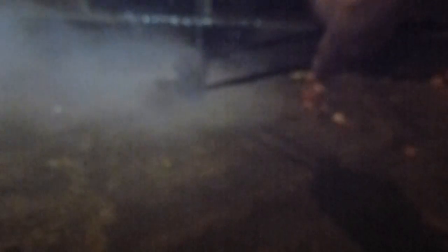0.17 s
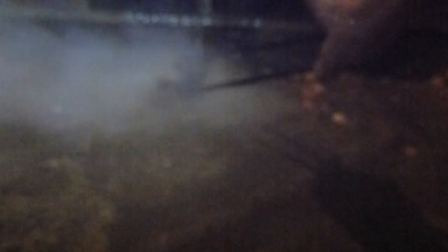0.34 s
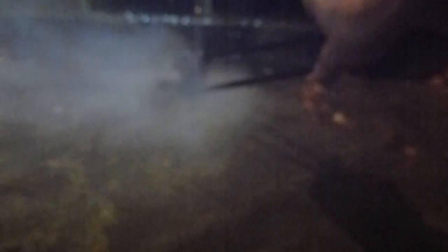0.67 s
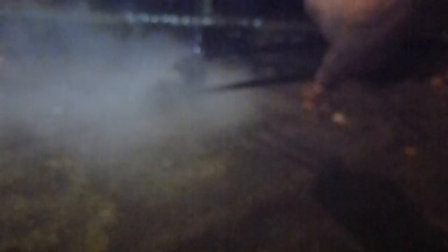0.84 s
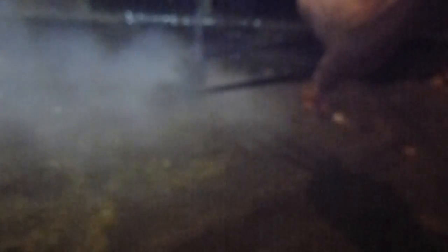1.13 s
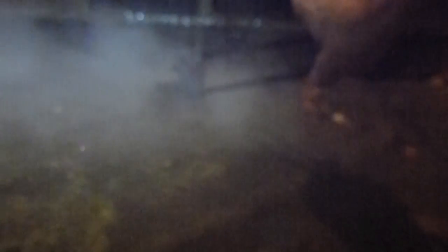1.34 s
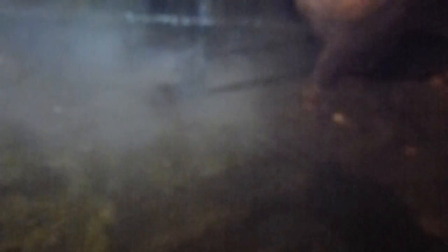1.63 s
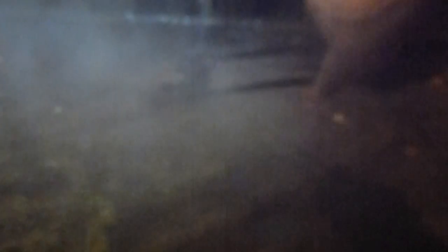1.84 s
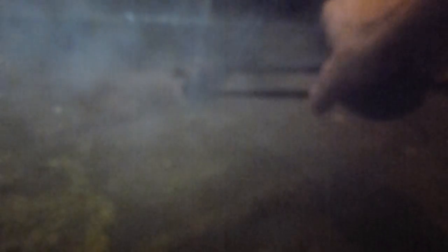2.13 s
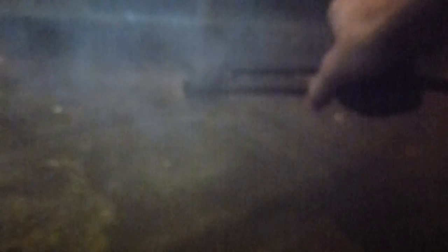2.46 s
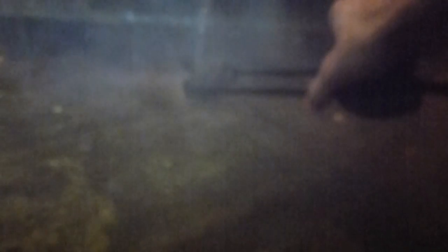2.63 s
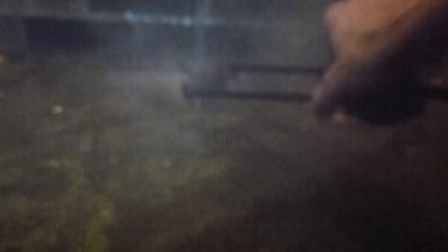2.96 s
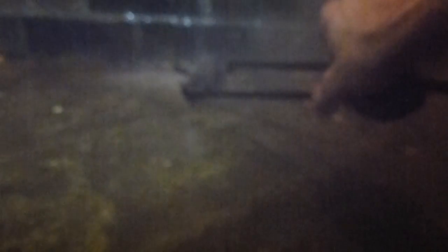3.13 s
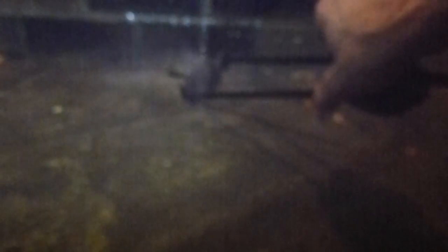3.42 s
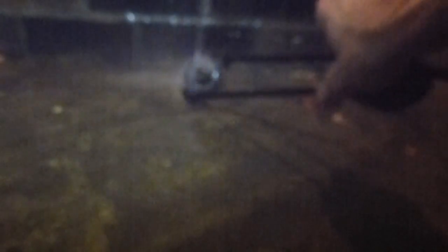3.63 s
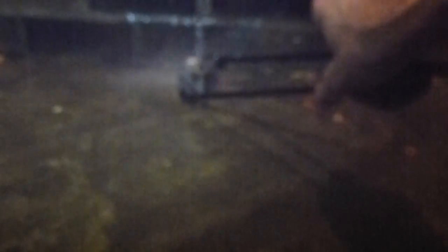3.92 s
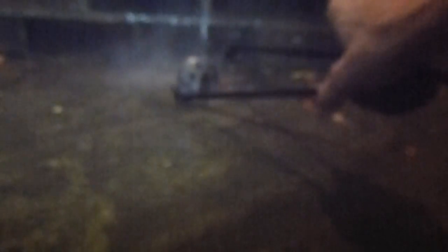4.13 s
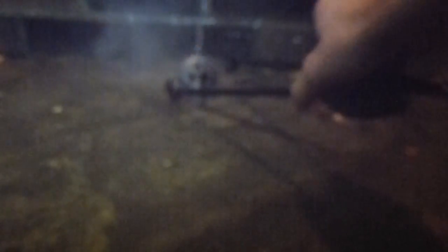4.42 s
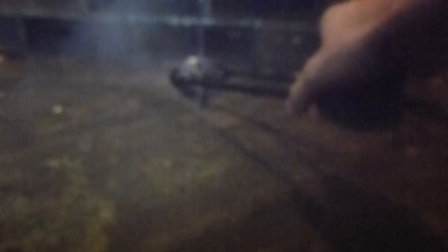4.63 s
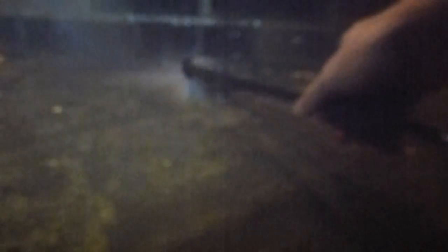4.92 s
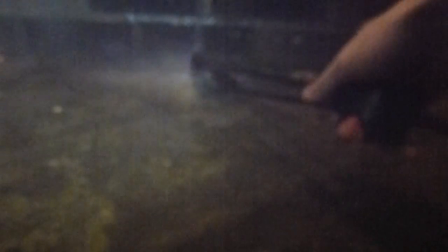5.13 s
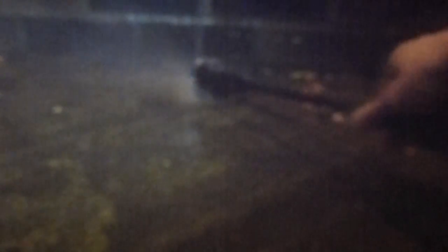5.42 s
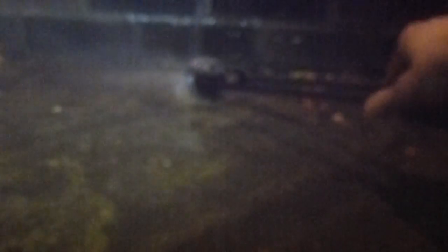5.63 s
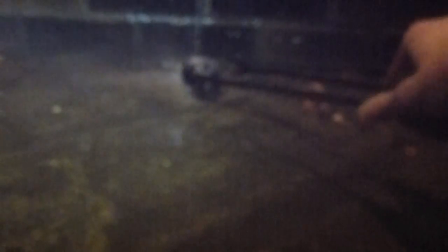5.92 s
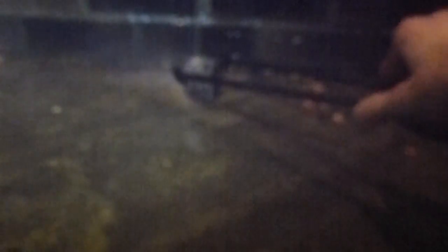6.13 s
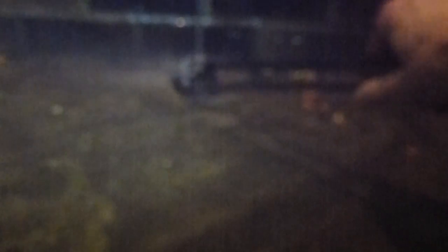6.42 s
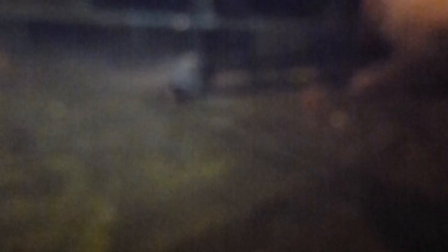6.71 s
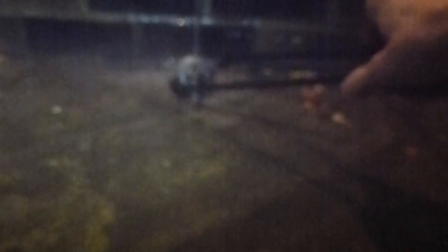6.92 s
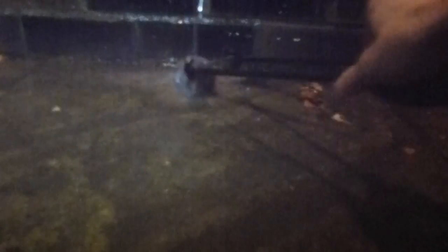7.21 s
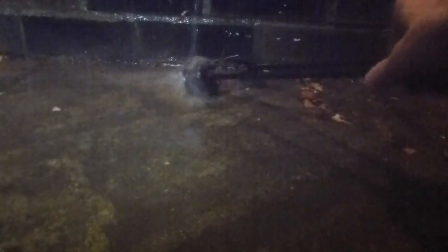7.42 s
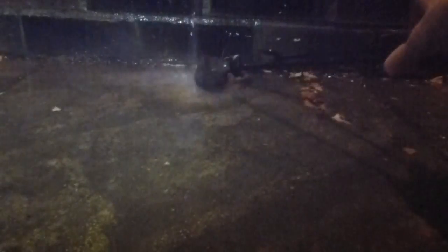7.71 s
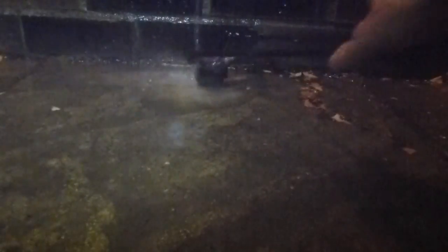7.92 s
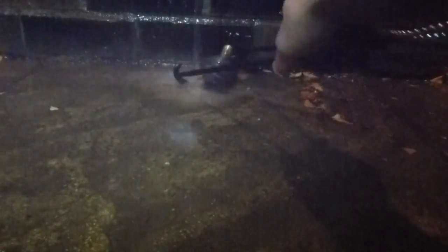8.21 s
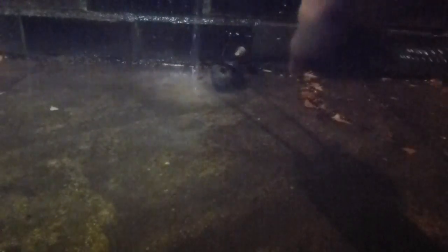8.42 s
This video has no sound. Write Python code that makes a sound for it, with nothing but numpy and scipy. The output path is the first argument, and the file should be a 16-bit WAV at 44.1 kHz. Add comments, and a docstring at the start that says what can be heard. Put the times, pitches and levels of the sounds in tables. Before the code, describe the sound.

Close outdoor sound on a paved yard, with a faint distant rumble and low motor hum underneath. From 0 s, water on hot metal gives a dense, bright, nearly steady hiss with occasional sharp spits. Around 2.3 s it swells as tongs scrape and tick and a few heavy drops thud hollowly; small ticks follow near 2.9 s. The hiss ducks abruptly at 3.4 s and recovers, with two thuds around 3.7 s and light scraping at 4.6 s. From 4.9 s it weakens and roughens. A rapid cluster of heavy wet thuds lands at 5.7-6.1 s, another at 6.5 s, over quiet patter. The sizzle sputters, surges at 7.6 s, and breaks into pings and crackles. From 7.2 s steel clinks and scrapes multiply, with more drops from 7.6 to 8.2 s and sharp clicks at 8.3-8.6 s as the fizz fades.

```python
"""Quenching hot metal

Water is poured over a hot piece of metal held in tongs just above a paved yard, heard from close by.
Dense noise bursts over smooth steam make the boiling hiss, which thins to pings and spits as the metal cools.
Heavy drops thud as filtered pushes with a hollow ring; the tongs scrape in noise and clink in decaying modes.
Water patters on the ground, over a distant noise rumble and a motor hum of two wavering sines."""
import sys
import numpy as np
from scipy import signal
from scipy.fft import rfft, irfft
from scipy.io import wavfile
from scipy.ndimage import uniform_filter1d

SR = 44100
rng = np.random.default_rng(int(sys.argv[2]) if len(sys.argv) > 2 else 0)


def wav_record(signal):
    """Record a signal, one row per channel, as 16-bit PCM in the file named by sys.argv[1]."""
    frames = np.transpose(np.atleast_2d(signal))
    bounded = np.clip(frames, -1, 1)
    # unit amplitude maps onto the largest positive 16-bit level
    quanta = np.round(bounded * 32767).astype(np.int16)
    wavfile.write(sys.argv[1], SR, quanta)


N = 377916

# Tone of the yard's distant rumble. Each row: frequency in Hz, relative gain in dB.
RUMBLE_COLOUR = [(20, -42), (35, -35), (55, -8), (85, 3), (150, 3), (250, -3), (500, -6.5), (1500, -34),
                 (8000, -19)]
# Water running onto the ground. Each row: time in seconds, level in dB before the run-off's own gain.
SPILL_LEVEL = [(0, -45), (1.3, -46), (2.5, -39.5), (3.85, -36.5), (5.0, -40.5), (5.95, -38.5), (6.25, -40),
               (7.1, -43), (8.05, -39), (8.57, -42.5)]
# Tone of the run-off. Each row: frequency in Hz, relative gain in dB.
SPILL_COLOUR = [(100, -62), (170, -5), (226, 4), (280, -3), (332, 3), (380, -8), (540, -8.5), (720, -16),
                (1500, -27)]
# Heavy drops on the ground. Each row: start in seconds, level of the loudest 4 ms in dB,
# pitch that the swing is centred around in Hz.
DROPS = [(2.274, -19, 252), (2.33, -20, 333), (2.536, -25.5, 470), (3.639, -23, 342), (3.785, -23, 230),
         (5.424, -24.5, 340), (5.692, -15.5, 240), (5.76, -17, 222), (5.835, -10.5, 330),
         (5.884, -14.5, 243), (5.936, -18.5, 334), (5.971, -16, 318), (6.011, -18, 314),
         (6.035, -16.5, 314), (6.071, -21.5, 298), (6.114, -28, 301), (6.468, -14, 258), (7.586, -20, 244),
         (7.627, -19, 240), (7.791, -17.5, 252), (7.896, -16, 322), (8.078, -18, 325), (8.125, -21, 240),
         (8.237, -22, 232)]
# Hollow ring after a thud. Each row: mode in Hz before a random detune, relative level in dB,
# time to fall by 60 dB in seconds.
HOLLOW_MODES = [(240, -0.5, 0.06), (334, -4.5, 0.12)]
# The tongs touch the piece or the ground. Each row: start in seconds, level of the loudest 4 ms in dB
# before panning, centre of the scrape in Hz, decay time of the scrape in seconds,
# thump of the ground in dB re scrape, ring of the steel in dB re scrape.
TOUCHES = [(2.249, -21, 1140, 0.0083, -2.5, -4), (2.811, -28, 1100, 0.0018, -3, -20),
           (2.851, -28, 1190, .002, -12, -11), (2.902, -30, 870, 0.002, -25, -24),
           (4.55, -34.5, 1210, 0.057, -5, -9), (4.666, -27.5, 1200, 0.0065, 2, -5),
           (5.443, -33.5, 1000, 0.019, 4, 3), (7.193, -28, 2000, 0.0044, -3, 2),
           (7.215, -28.5, 2030, 0.0061, -3, -2), (7.36, -21, 1920, 0.013, 8.5, 0),
           (7.531, -31.5, 2380, 0.053, -11, -11), (7.655, -33.5, 1810, 0.014, -14, 1),
           (7.762, -27.5, 1400, 0.0015, 1, -12), (8.081, -18, 4000, 0.0034, -4.5, -13.5),
           (8.162, -24.5, 2400, 0.011, -1, -8), (8.184, -26, 3200, 0.031, -4, 0.5),
           (8.307, -15, 3280, 0.0032, -15, -3.5), (8.318, -26.5, 2700, 0.012, -6, -18.5),
           (8.4, -10, 2150, 0.00039, -19, 5), (8.562, -14, 3220, 0.0048, -13, -1.5)]
# Modes of the steel tongs. Each row: frequency in Hz before a random detune,
# level in dB before the contact point weights it, time to fall by 60 dB in seconds.
TONG_MODES = [(1050, -4, 0.062), (1792, 3.5, 0.081), (1866, -14, 0.1), (2455, -3, 0.038), (3220, -18, 0.1),
              (3340, -3, 0.0089), (3940, -0.5, 0.052), (4950, 1, 0.016), (5650, 3, 0.023), (7130, 5, 0.019),
              (8500, -10, 0.027)]
# Large droplets bursting on the metal. Each row: start in seconds, level of the loudest 4 ms in dB,
# pitch in Hz, ring in dB re crack.
LARGE_SPITS = [(0.7677, -15.5, 5360, 13), (0.9812, -14, 5660, -4), (1.1517, -17.5, 9600, 0),
               (2.8095, -17.5, 6500, -2), (3.9394, -21.5, 6500, 6), (4.663, -20, 7810, 5.5),
               (5.3527, -24, 4480, -2), (5.6873, -23, 6600, 17.5), (5.9062, -19, 3250, -4),
               (6.1089, -20, 7560, -4), (6.2492, -25.5, 6900, -14), (6.4683, -20.5, 8800, -1),
               (6.472, -18.5, 5700, -17), (6.8709, -25, 10600, -10), (6.9132, -15.5, 3300, -3.5),
               (7.4062, -22, 3950, 24), (7.4586, -22, 9680, 5), (7.5023, -18, 10200, -8),
               (7.7648, -17, 2697, 5), (7.8084, -25, 8100, 15), (7.8595, -24, 3500, 16),
               (8.0698, -18.5, 7000, -6), (8.1492, -14.5, 6700, 1), (8.2786, -21.5, 6180, -1),
               (8.4394, -17, 2500, -2)]
# Vigour of the boiling. Each row: time in seconds, boil level in dB that the hiss follows.
BOIL_LEVEL = [(0, -30), (1.8, -28.5), (2.25, -26.5), (2.65, -29.5), (3.2, -29), (3.9, -30), (4.58, -29),
              (4.92, -33.5), (5.45, -34.0), (6.0, -40.5), (6.65, -36.5), (7.1, -41), (7.6, -32.5),
              (7.95, -38), (8.35, -34.5), (8.52, -45.5)]
# The stream slips off the metal and the hiss dips. Each row: time in seconds, depth in dB,
# recovery time in seconds.
MISSES = [(3.385, 13.5, 0.17), (5.26, 5.5, 0.022), (8.26, 12, 0.033)]
# Tone of the steam. Each row: frequency in Hz, relative gain in dB.
STEAM_COLOUR = [(300, -6), (700, -12), (900, -8), (1700, -6), (2150, -12.5), (2600, 1), (3400, -4),
                (5500, -2.5), (7500, -1), (10000, 0.5), (13000, -2), (16000, -3)]
# Resonances and notches around the piece, which change as it is turned. Each row: centre in Hz,
# width in Hz, gain in dB when lying, gain in dB when lifted, gain in dB when set down.
HOLLOWS = [(646, 290, -6.5, 1, -2.5), (835, 84, 7.5, 0.5, 6), (1165, 42, 1.5, 4, 0.5),
           (1726, 57, -4, 6.5, 2), (2060, 73, -1, -6, -1), (2610, 284, -1, -5.5, -8),
           (3120, 580, -1.5, 1.5, 3.5), (3500, 300, 0.5, -4.5, -6.5), (3820, 450, 2.5, 6, 3.5),
           (4400, 230, -1, -0.5, 1.5), (4875, 150, -2.5, 7, 0.5), (5750, 840, 2.5, 2.5, 2),
           (6850, 400, 3, 3, 4.5), (8950, 1300, -2, 0, -0.5)]
# How the piece is held. Each row: time in seconds, pose (0 lying, 1 lifted, 2 set down;
# values between blend two poses, values past 2 fade the last one).
POSE = [(0, 0.034), (1.8, 0.27), (2.3, 1), (4.7, 1.1), (5.5, 2.044), (8.57, 2.315)]
# Stereo width. Each row: frequency in Hz, gain of the side signal in dB.
WIDTH = [(60, -16), (130, -21.5), (250, -26.5), (550, -12.5), (1100, -15), (2100, -56), (3200, -53),
         (4700, -12), (8100, -9.5), (15000, -4)]

# distant rumble: level at the start, and its steady fade
RUMBLE_DB, RUMBLE_FADE_DB_PER_S = -42.5, 0.6
# far motor: fundamental and octave, levels before waver, beat, swell and the final bass cut
HUM_HZ, HUM_DB, OCTAVE_DB = 55.64, -54, -60.5
SWELL_S, SWELL_HALF_S, SWELL_DB = 2.8, 0.99, 12  # the octave swells once
BEAT_PEAK_S, BEAT_PERIOD_S, BEAT_DB = 3.4, 1.76, 2.5  # the fundamental beats slowly
# each heavy drop is trailed by a smaller one: earliest and latest delay, level re the first
TRAIL_MIN_S, TRAIL_MAX_S, TRAIL_DB = 0.018, 0.08, -10
# small droplets burst at random: rate when most broken, loudest 4 ms and its range either way, pitch range
STRAY_PER_S, STRAY_DB, STRAY_SPREAD_DB = 14, -27, 2
STRAY_LOW_HZ, STRAY_HIGH_HZ = 4220, 10700
MISS_FALL_S = 0.029
# layers of the hiss: level re the boil level at full boil, and dB per dB of boil level
FULL_BOIL_DB = -30
HISS_DB, HISS_SLOPE = -0.5, 1
SPLASH_DB, SPLASH_SLOPE = -10, 0.86
SPRAY_DB, SPRAY_SLOPE = -1.6, 0.86
# weaker boiling breaks up: spread of burst sizes at full boil, its rise per dB lost, its most
SPUTTER_DB, SPUTTER_SLOPE, SPUTTER_MAX_DB = 2.5, 0.42, 5.5
TOP_HZ = 15800


def undb(db):
    """Decibels to gain."""
    return 10 ** (np.asarray(db) / 20)


def curve(rows):
    """Rows of (s, value), joined by straight lines in time."""
    return np.interp(np.arange(N) / SR, *np.transpose(rows))


def unit(x):
    """Scale to rms 1."""
    return x / np.sqrt(np.mean(x ** 2) + 1e-18)


def colour(x, points):
    """Filter by a spectrum of (Hz, dB) points, joined over log frequency."""
    hz, db = np.transpose(points)
    f = np.fft.rfftfreq(x.shape[-1], 1 / SR)
    gain = undb(np.interp(np.log(f + 1), np.log(hz), db))
    return irfft(rfft(x) * gain, x.shape[-1])


def band(x, low_hz, high_hz, order=2):
    """Causal band-pass."""
    sos = signal.butter(order, [low_hz, high_hz], "band", fs=SR, output="sos")
    return signal.sosfilt(sos, x)


def walk(rate):
    """Random levels held 1 / rate s and slewed twice, scaled to rms 1."""
    hold = int(SR / rate)
    steps = np.repeat(rng.standard_normal(N // hold + 1), hold)
    return unit(uniform_filter1d(uniform_filter1d(steps, hold), hold)[:N])


def ring(t, hz, t60):
    """One decaying mode, down 60 dB after t60 seconds."""
    return np.sin(2 * np.pi * hz * t) * np.exp(-np.log(1000) * t / t60)


def add(out, s, sound, db):
    """Mix in an event at time s, the loudest 4 ms of its first channel at the given level."""
    loudest = np.sqrt(uniform_filter1d(np.atleast_2d(sound)[0] ** 2, size=176).max())
    i = min(int(s * SR), N - 1)
    out[..., i:i + sound.shape[-1]] += sound[..., :N - i] * undb(db) / loudest


def stereo(pair):
    """Mid and side to left and right, with the side coloured by WIDTH."""
    mid, side = pair
    return mid + np.array([[1], [-1]]) * colour(side, WIDTH)


def bursts(per_s, spread_db, length_s, limit=3.2):
    """Dense tiny bursts, most small and a few large, each a puff of noise; the slow level is held near 1."""
    struck = rng.random(N) < per_s / SR
    size = undb(spread_db * np.minimum(rng.exponential(size=N), limit)) * struck
    power = signal.lfilter([1], [1, -np.exp(-2 / (length_s * SR))], size ** 2)
    slow_power = uniform_filter1d(power, size=16000)
    return rng.standard_normal((2, N)) * np.sqrt(power / (slow_power + 1e-9) + 1e-12)


def yard(waver_db=1.4, drift_db=1.0, wobble_rad=0.3):
    """Distant rumble of coloured noise, and a motor hum whose two partials waver in level and phase."""
    t = np.arange(N) / SR
    octave_db = OCTAVE_DB + SWELL_DB / (1 + ((t - SWELL_S) / SWELL_HALF_S) ** 10)
    beat_db = BEAT_DB * np.cos(2 * np.pi * (t - BEAT_PEAK_S) / BEAT_PERIOD_S)
    turn = 2 * np.pi * HUM_HZ * t + wobble_rad * walk(9)
    hum = 0
    for k, db in [(1, HUM_DB + beat_db), (2, octave_db)]:
        hum = hum + undb(db + waver_db * walk(4 * k * k)) * unit(np.sin(k * turn))
    rumble_db = RUMBLE_DB - RUMBLE_FADE_DB_PER_S * t + drift_db * walk(2.5)
    rumble = unit(colour(rng.standard_normal((2, N)), RUMBLE_COLOUR)) * undb(rumble_db)
    return stereo(rumble) + hum


def spill(gain_db=1):
    """Run-off patters softly on the ground: sparser, longer bursts, coloured low."""
    patter = bursts(per_s=260, spread_db=2.0, length_s=0.0081)
    return unit(colour(patter, SPILL_COLOUR)) * undb(curve(SPILL_LEVEL) + gain_db)


def thuds(push_s=0.00043, peak_s=0.00262, low_ratio=0.71, high_ratio=1.49,
          ring_db=-1, slap_db=-15, detune=0.025):
    """A drop flattens on the ground: its push peaks, gives one heavy swing and leaves a low hollow ring."""
    out, t = np.zeros(N), np.arange(6000) / SR
    push = np.exp(-.5 * ((t - peak_s) / push_s) ** 2)
    slap = band(push, 604, 1200)
    for s, db, hz in DROPS:
        swing = band(push, hz * low_ratio, hz * high_ratio, order=3)
        hollow = 0
        for mode_hz, mode_db, t60 in HOLLOW_MODES:
            tuned_hz = mode_hz * (1 + detune * rng.standard_normal())
            hollow = hollow + undb(mode_db + ring_db) * ring(t, tuned_hz, t60)
        hollow = band(signal.fftconvolve(hollow, push / push.sum())[:len(t)], 241, 610)
        drop = swing / abs(swing).max() + hollow + undb(slap_db) * slap / abs(slap).max()
        add(out, s, drop, db)
        delay_s = TRAIL_MIN_S + (TRAIL_MAX_S - TRAIL_MIN_S) * rng.random()
        add(out, s + delay_s, drop, db + TRAIL_DB)
    return out


def tongs(focus_db=7, chatter_db=-15, detune=0.0084, rise_s=0.0014, scatter_db=-14):
    """A blow and a fading noisy scrape ring the steel; modes far from the scrape's centre ring less."""
    out, t = np.zeros((2, N)), np.arange(8192) / SR
    for s, db, centre_hz, length_s, ground_db, ring_db in TOUCHES:
        scrape = rng.standard_normal((2, len(t))) * np.exp(-t / length_s) * (1 - np.exp(-t / rise_s))
        push = undb(chatter_db) * scrape + (t == 0)  # the blow is a single click
        grip = 1 + detune * rng.standard_normal(len(TONG_MODES))  # the grip shifts each mode a little
        modes = 0
        for (hz, mode_db, t60), shift in zip(TONG_MODES, grip):
            octaves_off = abs(np.log2(hz / centre_hz))
            modes = modes + undb(mode_db - focus_db * octaves_off) * ring(t, hz * shift, t60)
        rung = signal.fftconvolve(push, modes[None], axes=1)[:, :len(t)]
        steel = band(rung, centre_hz * 1.15, 15000)
        grit = band(scrape, centre_hz * 0.7, centre_hz * 2.4)
        thump = band(scrape, 247, 554)
        touch = unit(grit) + undb(ring_db) * unit(steel) + undb(ground_db) * unit(thump)
        add(out, s, touch, db)
    # the tongs are held on the right
    return out[0] * undb([[-.8], [.8]]) + undb(scatter_db) * np.array([[-1], [1]]) * out[1]


def spits(rows, crack_s=0.0013, tail_db=-21, tail_s=0.016, sharpness=3.94, rise_s=0.00032):
    """A droplet flashes to steam: a crack, a brief pitched ring, and a longer tail scattered by the ground."""
    out, t = np.zeros((2, N)), np.arange(2048) / SR
    decay = np.exp(-t / crack_s) + undb(tail_db) * np.exp(-t / tail_s)
    shape = (1 - np.exp(-t / rise_s)) * decay
    for s, db, hz, ring_db in rows:
        puff = rng.standard_normal((2, len(t))) * shape
        pitched = band(puff, hz * (1 - .5 / sharpness), hz * (1 + .5 / sharpness))
        crack = band(puff, 3120, 12800)
        add(out, s, unit(crack) + undb(ring_db) * unit(pitched), db)
    return out


def stray_spits(sputter_db, ring_db=3, ring_spread_db=12):
    """Rows like LARGE_SPITS for the small droplets: likelier where the boiling is broken."""
    rows = []
    for when, chance, size, pitch, tone in rng.random((int(STRAY_PER_S * N / SR), 5)):
        i = int(when * N)
        if chance < (sputter_db[i] / SPUTTER_MAX_DB) ** 2:
            db = STRAY_DB + STRAY_SPREAD_DB * (2 * size - 1)
            hz = STRAY_LOW_HZ + (STRAY_HIGH_HZ - STRAY_LOW_HZ) * pitch
            rows.append((i / SR, db, hz, ring_db + ring_spread_db * (2 * tone - 1)))
    return rows


def boiling():
    """Boil level (dB), with a quick fall and its own recovery time at each miss, and how broken it is (dB)."""
    t, boil_db = np.arange(N) / SR, curve(BOIL_LEVEL)
    for s, depth_db, recovery_s in MISSES:
        closeness = np.where(t < s, ((t - s) / MISS_FALL_S) ** 2, (t - s) / recovery_s)
        boil_db = boil_db - depth_db * np.exp(-closeness)
    sputter_db = SPUTTER_DB + SPUTTER_SLOPE * (FULL_BOIL_DB - boil_db)
    return boil_db, np.clip(sputter_db, 1, SPUTTER_MAX_DB)


def fizz(per_s=900, spread_db=4.5, decay_s=0.0029, low_hz=2800, high_hz=15000):
    """Tiny bubbles ping as they burst, each a short decaying sine at its own pitch."""
    when, pitch, size, side = rng.random((int(per_s * N / SR), 4)).T[:, :, None]
    hz, n = low_hz + (high_hz - low_hz) * pitch, np.arange(256)
    gain = undb(-spread_db * np.log(size + 0.0077))  # most small, a few large
    pings = gain * np.sin(2 * np.pi * hz * n / SR) * np.exp(-n / SR / decay_s)
    at = ((when * (N - len(n))).astype(int) + n).ravel()
    mid = np.bincount(at, pings.ravel(), N)
    side_signal = np.bincount(at, (pings * np.sign(side - .5)).ravel(), N)
    return unit(np.array([mid, side_signal]))


def ground_echo(x, lag_s=0.000952, sway=0.078, echo=0.1):
    """The paving reflects the hiss; the boiling spot wanders, so the delay and the colour drift."""
    i = np.arange(N)
    there = i - SR * lag_s * (1 + sway * walk(4))
    return x + echo * np.array([np.interp(there, i, channel) for channel in x])


def seethe(x, depth_db=1.0, rate=9):
    """The wetted patch shifts, so neighbouring bands of the hiss swell and fade independently."""
    spectrum, f = rfft(x), np.fft.rfftfreq(N, 1 / SR)
    centres = np.geomspace(2800, 11000, 6)
    out = 0
    for one in np.eye(len(centres)):
        # overlapping triangular bands; the outer two reach to the ends of the spectrum
        out = out + irfft(spectrum * np.interp(f, centres, one), N) * undb(depth_db * walk(rate))
    return out


def hollows(x):
    """The spaces around the piece resonate and cancel; its pose crossfades three such colours."""
    spectrum, f, pose = rfft(x), np.fft.rfftfreq(N, 1 / SR), curve(POSE)
    voiced = 0
    for k in range(3):
        lift_db = sum(row[2 + k] * np.exp(-2 * ((f - row[0]) / row[1]) ** 2) for row in HOLLOWS)
        weight = np.maximum(1 - abs(pose - k), 0)
        voiced = voiced + weight * irfft(spectrum * undb(lift_db), N)
    return voiced


def sizzle(boil_db, sputter_db, steam_share=0.63, fizz_db=-8.0, snap_db=-5,
           clump=0.29, surge=0.14, flicker_db=0.46):
    """Bursting bubbles over smooth escaping steam, coloured by the hollows around the piece."""
    bubbles = np.sqrt(1 - steam_share) * bursts(per_s=2600, spread_db=sputter_db, length_s=0.0022)
    steam = np.sqrt(steam_share) * rng.standard_normal((2, N))
    # on cooler metal, single bubbles ping and snap through the steam
    snaps = undb(snap_db) * bursts(per_s=240, spread_db=3.0, length_s=0.0011, limit=4.5)
    grains = (undb(fizz_db) * fizz() + snaps) * undb(1.76 * (sputter_db - sputter_db.max()))
    # water wets the metal in clumps and surges, more so as the boiling breaks up
    wetting_db = sputter_db * (clump * walk(85) + surge * walk(14))
    boil = ground_echo((bubbles + steam + grains) * undb(wetting_db))
    voiced = hollows(colour(seethe(boil), STEAM_COLOUR))
    # large bubbles splash in the mids, small ones hiss, the finest spray lies on top
    splash = colour(voiced, [(2100, 0), (2600, -8), (3200, -40)])
    spray = colour(voiced, [(8500, -40), (9600, -8), (10500, 0)])
    hiss = voiced - splash - spray
    layers = [(hiss, HISS_DB, HISS_SLOPE), (splash, SPLASH_DB, SPLASH_SLOPE), (spray, SPRAY_DB, SPRAY_SLOPE)]
    out = 0
    for part, db, slope in layers:
        level_db = FULL_BOIL_DB + db + slope * (boil_db - FULL_BOIL_DB)
        out = out + unit(part) * undb(level_db + flicker_db * walk(22.03))
    return out


def scene():
    """Yard, run-off, drops, tongs and spits around the steam, which sits slightly to the left."""
    boil_db, sputter_db = boiling()
    steam = stereo(sizzle(boil_db, sputter_db)) * undb([[.35], [-.35]])
    droplets = spits(LARGE_SPITS) + spits(stray_spits(sputter_db))
    return yard() + stereo(droplets + spill()) + thuds() + tongs() + steam


def record(dry):
    """Cut the deepest bass gently and the top steeply."""
    lean = signal.sosfilt(signal.butter(4, 44, "high", fs=SR, output="sos"), dry)
    return signal.sosfilt(signal.ellip(12, .2, 80, TOP_HZ, fs=SR, output="sos"), lean)


dry = scene()
out = record(dry)
wav_record(out)
```